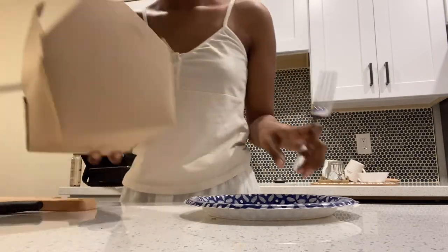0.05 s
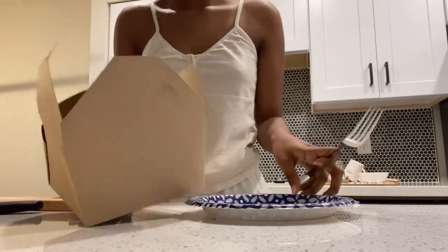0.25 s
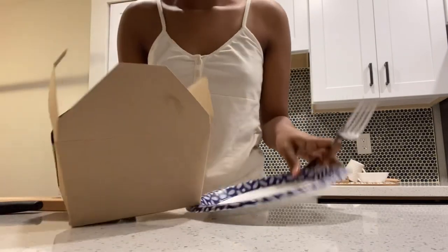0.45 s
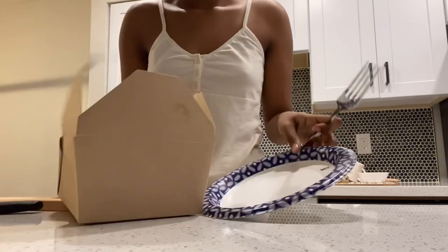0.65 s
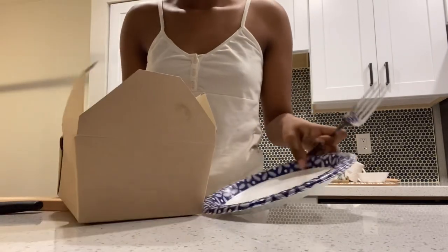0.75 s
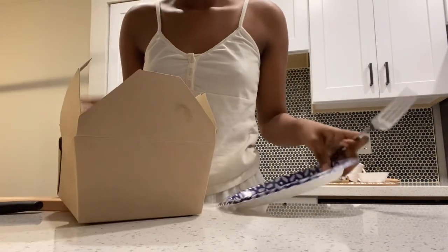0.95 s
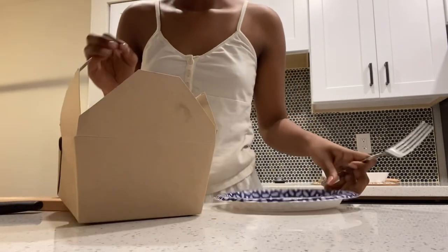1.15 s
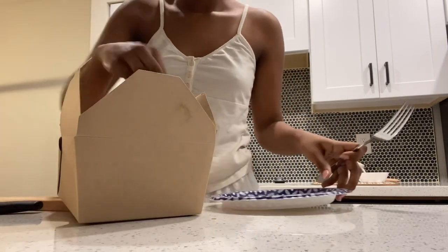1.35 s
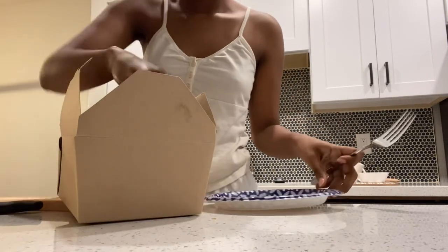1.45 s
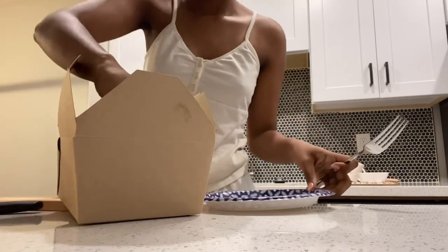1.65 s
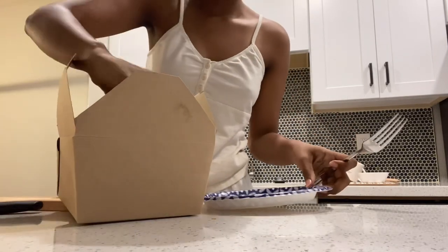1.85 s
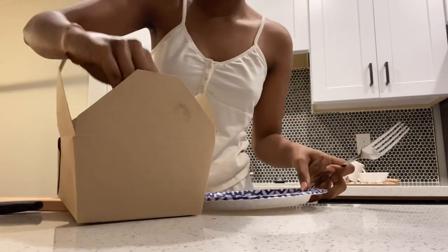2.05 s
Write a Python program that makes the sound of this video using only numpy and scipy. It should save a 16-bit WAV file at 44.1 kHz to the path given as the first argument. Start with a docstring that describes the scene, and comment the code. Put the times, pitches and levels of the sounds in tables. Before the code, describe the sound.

Hollow knocks and light scrapes of a cardboard takeout box set down on a kitchen counter.

```python
"""Takeout box on a stone countertop

A cardboard box lands on one corner, slides, and drops flat against a paper plate; each knock rings its
walls and booms in its hollow. The plate tips up, scrapes and is laid down again, and a hand rummages in
the box, paper fibres catching and slipping. A small kitchen hums and answers each knock.
A pair of microphones stands close by on the counter."""
import sys
import numpy as np
from scipy import signal
from scipy.fft import rfft, irfft
from scipy.io import wavfile

SR = 44100
rng = np.random.default_rng(int(sys.argv[2]) if len(sys.argv) > 2 else 0)


def unload_audio(sound):
    """Save the sound as a 16-bit wav file, at the path given as the first command line argument."""
    columns = np.transpose(np.atleast_2d(sound))
    # keep every value between -1 and 1, then stretch to whole-number steps
    steps = np.round(np.clip(columns, -1, 1) * 32767)
    wavfile.write(sys.argv[1], SR, steps.astype(np.int16))


N = 92610
T = np.arange(N) / SR
HZ = np.fft.rfftfreq(2 * N, 1 / SR)

# Modes of the cardboard walls. Each row: frequency in Hz, level in dB, seconds to fall 60 dB.
WALL_MODES = [(305, -13.5, 0.12), (368.5, -4.5, 0.094), (442, -13, 0.051), (530.8, -16, 0.17),
              (743, -22, 0.2), (852, -14.5, 0.044), (935, -17, 0.078), (1096, -19, 0.058),
              (1130, -24.5, 0.095), (1800, -60, 0.12)]


def amp(db):
    """Decibels to gain."""
    return 10 ** (np.asarray(db) / 20)


def unit(x):
    """Scales to rms 1."""
    return x / np.sqrt(np.mean(x ** 2) + 1e-20)


def curve(points, hz):
    """Interpolates rows of frequency and value on a log-frequency axis."""
    points_hz, values = np.transpose(points)
    return np.interp(np.log(hz + 1), np.log(points_hz + 1), values)


def pan(db):
    """Left and right gains, with the left louder by db."""
    return amp(np.array([[db], [-db]]) / 2)


def add(mix, start_s, sound):
    """Mixes a sound into both channels from a start time."""
    part = mix[:, round(start_s * SR):][:, :sound.shape[-1]]
    part += sound[..., :part.shape[1]]


def colour(x, db):
    """Minimum-phase filter with a gain in dB at each frequency of HZ."""
    log_gain = np.log(amp(np.r_[db, db[-2:0:-1]]))
    response = np.exp(np.conj(signal.hilbert(log_gain)))[:N + 1]
    return irfft(rfft(x, 2 * N) * response)[..., :N]


def pair(a, b, likeness):
    """Two channels from two unrelated sounds; likeness is their correlation."""
    return np.array([a, likeness * a + np.sqrt(1 - likeness ** 2) * b])


def ring(modes, t):
    """Struck modes ring as a sum of dying sines."""
    return sum(amp(db - 60 * t / t60) * np.sin(2 * np.pi * hz * t) for hz, db, t60 in modes)


def appliance_hum():
    """Steady low rush of kitchen appliances."""
    # Tone of the rush. Each row: frequency in Hz, relative level in dB.
    spectrum = [(40, -6.5), (58, 2.5), (80, -8.5), (112, -16), (168, 0), (205, -5.5), (300, -2),
                (420, -11.5), (750, -15), (1100, -21.5), (1500, -37), (3000, -47.5), (15000, -56.5)]
    noise = pair(*rng.standard_normal((2, N)), likeness=0.09)
    return amp(-46) * unit(colour(noise, curve(spectrum, HZ)))


def kitchen_echo(x):
    """Quick reflections from counter and cupboards, then a short tail."""
    # Decay of the room. Each row: frequency in Hz, seconds to fall 60 dB.
    room_t60 = [(80, 0.34), (260, 0.27), (700, 0.27), (2000, 0.45), (5000, 0.5), (14000, 0.066)]
    gap_s, early_decay_s, echoes_per_s = 0.0034, 0.0039, 3000
    t = T[:SR // 2]
    shape = (2, 2, len(t))
    early, tail = rng.choice([-1., 1.], shape) * (rng.random(shape) < echoes_per_s / SR)
    hz, when, bands = signal.stft(tail, SR, nperseg=256)
    bands *= amp(-60 * when / curve(room_t60, hz)[:, None])
    tail = signal.istft(bands, SR, nperseg=256)[1][:, :len(t)] * (t > gap_s)
    early *= np.exp(-t / early_decay_s) * (t > gap_s)
    echo = (amp(-3.5) * unit(early) + amp(-6.5) * unit(tail)) / np.sqrt(len(t))
    return signal.fftconvolve(x, echo, axes=1)[:, :N]


def brief_resonances():
    """A scrape or a light bump sets one resonance of box or plate ringing briefly."""
    # Each row: start in seconds, decay in seconds, pitch in Hz, bandwidth in Hz, level in dB.
    resonances = [(0.344, 0.017, 1830, 520, -38.5), (0.319, 0.038, 8130, 450, -49.5),
                  (.597, 0.018, 1010, 385, -24.5), (.82, 0.025, 920, 80, -39.5),
                  (1.766, 0.056, 4350, 300, -68), (2.053, .03, 1110, 206, -42),
                  (2.056, 0.032, 583, 50, -41)]
    attack_s = 0.0013
    t, mix = T[:SR // 2], np.zeros((2, N))
    for start_s, decay_s, hz, width_hz, db in resonances:
        band = 1 / (1 + (2 * (HZ - hz) / width_hz) ** 4)
        drive = rng.standard_normal(2 * N)
        swell = (1 - np.exp(-t / attack_s)) * np.exp(-t / decay_s)
        ringing = irfft(rfft(drive) * band)[:len(t)] * swell
        add(mix, start_s, amp(db) * unit(ringing) * np.sqrt(np.mean(swell ** 2)))
    return mix


def friction(spectrum, likeness=0.041, grains_per_s=7000):
    """Paper fibres catch and slip: dense clicks of uneven size that come in clumps."""
    spread_db, flutter_db, clump_s = 0.5, 2.5, 0.0082
    sizes = amp(spread_db * np.minimum(rng.exponential(1, (2, N)), 4))
    signs = rng.choice([-1, 1], (2, N))
    grains = sizes * signs * (rng.random((2, N)) < grains_per_s / SR)
    clumps = unit(signal.fftconvolve(rng.standard_normal(N), np.hanning(int(2 * clump_s * SR)), "same"))
    clicks = pair(*grains, likeness) * amp(flutter_db * clumps)
    return unit(colour(clicks, curve(spectrum, HZ)))


def rubs():
    """Cardboard, plate and hand rub: strokes of scratch, fine fizz and a rumble that rings the walls."""
    # Each row: start in seconds, length in seconds, then rumble, scratch and fizz levels in dB.
    strokes = [(0.258, 0.052, -64, -67, -69), (0.311, 0.066, -39.5, -48, -54),
               (0.377, 0.175, -44, -57, -59.5), (0.522, 0.034, -38, -45.5, -56),
               (0.547, 0.072, -36.5, -49.5, -57), (0.613, 0.072, -33.5, -61, -62),
               (0.732, 0.12, -41, -65, -73), (0.783, 0.013, -35, -44.5, -45.5),
               (0.789, 0.066, -44, -53.5, -46.5), (0.856, 0.067, -68, -61, -64),
               (0.943, 0.096, -54, -56, -52), (1.044, 0.12, -55.5, -57, -59),
               (1.286, 0.039, -58.5, -66.5, -72), (1.362, 0.1, -61.5, -65, -68.5),
               (1.471, 0.2, -60.5, -64.5, -70), (1.576, 0.098, -52.5, -63, -66),
               (1.693, 0.57, -54, -66.5, -74.5), (1.931, 0.13, -49.5, -62.5, -67.5),
               (2.045, .08, -48, -57.5, -71)]
    # Tone of the three parts of a rub. Each row: frequency in Hz, relative level in dB.
    rumble_tone = [(40, -34), (80, 3.5), (115, -3), (250, -2), (430, -12.5), (600, 0), (880, -4),
                   (1150, -1), (1400, -17.5), (2500, -21), (6000, -48.5)]
    scratch_tone = [(400, -26), (1450, -4), (1900, -1), (2300, 3.5), (3700, 0.5), (4450, 2.5), (5300, -4.5),
                    (7400, -1.5), (8300, -2.5), (10000, -20), (15000, -52)]
    fizz_tone = [(2000, -44), (5000, -0.5), (7000, 0.5), (8700, 6), (10000, 4), (12000, 5.5), (14300, 0.5),
                 (15600, -42)]
    attack_s, release_s, fizz_lag_s = 0.012, 0.019, 0.000136
    power = np.zeros((3, N))
    for start_s, length_s, *levels_db in strokes:
        rise = np.clip((T - start_s) / attack_s, 0, 1)
        fall = np.exp(-np.maximum(T - start_s - length_s, 0) / release_s)
        power += (amp(levels_db)[:, None] * rise * fall) ** 2
    rumble_gain, scratch_gain, fizz_gain = np.sqrt(power)
    drag = friction(rumble_tone)
    ringing = signal.fftconvolve(drag, ring(WALL_MODES, T[:SR // 2])[None], axes=1)[:, :N]
    rumble = unit(drag + amp(-9) * unit(ringing))
    fizz = friction(fizz_tone, likeness=0.93)
    fizz[1] = np.roll(fizz[1], round(fizz_lag_s * SR))  # reaches the right microphone later
    scratch = friction(scratch_tone, grains_per_s=1500)
    return pan(4.5) * rumble_gain * rumble + scratch_gain * scratch + fizz_gain * fizz


def snap(t, top_hz, decay_s):
    """A stiff paper edge lets go: a crack of noise with a short tail."""
    tail_db, tail_s = -21.5, 0.0048
    envelope = np.exp(-t / decay_s) + amp(tail_db) * np.exp(-t / tail_s)
    noise = pair(*rng.standard_normal((2, len(t))), likeness=0.097)
    return signal.lfilter(*signal.butter(2, top_hz, fs=SR), envelope * noise)


def crackles():
    """Paper crackles in small, very short snaps."""
    # Each row: start in seconds, level in dB.
    ticks = [(0.3066, -33), (0.548, -22), (.602, -45), (0.6745, -28.5), (0.948, -32), (1.156, -32),
             (1.4862, -35), (1.836, -41)]
    mix = np.zeros((2, N))
    for start_s, db in ticks:
        tick = snap(T[:SR // 2], top_hz=10200, decay_s=0.00016)
        add(mix, start_s, amp(db) * np.diff(tick))  # diff brightens the snap
    return mix


def bending_waves(x):
    """Cardboard carries low notes more slowly than high ones, so each thud drops in pitch."""
    bass_lag_s, half_lag_hz = 0.00473, 242
    phase = 2 * np.pi * bass_lag_s * half_lag_hz * np.arctan(HZ / half_lag_hz)
    return irfft(rfft(x, 2 * N) * np.exp(-1j * phase))[:, :N]


def knocks():
    """Box and plate strike: each contact is a brief slap that rings the walls, a boom and a dry snap."""
    # Each row: start in seconds, slap level in dB, slap pitch in Hz, boom level in dB, snap level in dB,
    # snap low-pass in Hz, left over right in dB.
    contacts = [(0.2439, -8, 519, -20, -25.5, 4300, 3), (.2478, -12.5, 850, -54, -67, 2114, 1),
                (0.2567, -19, 704, -35, -59, 2010, -5), (0.3075, -22.5, 1080, -56, -21.5, 5030, -2.5),
                (.329, -25.5, 710, -44, -46, 8000, 5), (0.354, -24.5, 730, -45, -38, 4000, 5),
                (0.5468, -10, 1054, -28.5, -12, 2670, 5.5), (0.5543, -27, 356, -32, -22.5, 6040, 4.5),
                (0.581, -20.5, 860, -21.5, -29, 3000, 2), (0.5956, -13, 860, -42, -47, 9000, 0),
                (0.602, -25, 880, -51, -14.5, 7100, -2), (0.6057, -17.5, 910, -66, -62, 5000, -1),
                (0.6762, -17, 842, -48, -19.5, 4200, -1), (0.69, -28.5, 355, -29.5, -46, 2900, 8.5),
                (.820, -26, 900, -61, -34.5, 4170, -4), (1.056, -34, 1110, -58, -30.5, 8000, -0.5),
                (1.1672, -34, 520, -42, -34.5, 3970, -7), (1.1975, -26.5, 784, -57, -35, 3100, -2),
                (1.486, -51, 1870, -70, -30.5, 9600, -5)]
    # Low modes of the hollow box. Each row: frequency in Hz, level in dB, seconds to fall 60 dB.
    hollow_modes = [(63.4, -18, 0.083), (81.3, -1.5, 0.14), (134, 2.5, 0.056), (158.2, -4.5, 0.22),
                    (200.6, -1.5, 0.09)]
    # Tone of the snaps. Each row: frequency in Hz, gain in dB.
    snap_tone = [(200, -19), (900, 4), (2000, 4.5), (4200, 1.5), (6000, -3), (8500, -1), (12000, -9),
                 (16000, -37)]
    boom_rise_s, cycles_to_peak = 0.0032, 0.73
    t = T[:SR // 2]
    walls = ring(WALL_MODES, t)
    boom = ring(hollow_modes, t) * (1 - np.exp(-t / boom_rise_s))
    thuds, snaps = np.zeros((2, 2, N))
    for start_s, slap_db, hz, boom_db, snap_db, top_hz, pan_db in contacts:
        age = t * hz / cycles_to_peak
        slap = age ** 2 * np.exp(2 * (1 - age)) * np.sin(2 * np.pi * hz * t)
        ringing = signal.fftconvolve(slap / abs(rfft(slap)).max(), walls)[:len(t)]
        add(thuds, start_s, pan(pan_db) * (amp(slap_db) * (slap + ringing) + amp(boom_db) * boom))
        add(snaps, start_s, pan(pan_db) * amp(snap_db) * snap(t, top_hz, decay_s=0.00065))
    return bending_waves(thuds) + colour(snaps, curve(snap_tone, HZ))


def scene():
    """Box and plate knock and rub on the counter, with their echo, over the kitchen's hum."""
    hits = knocks() + crackles()
    handling = rubs() + brief_resonances()
    return hits + handling + kitchen_echo(hits + amp(-5.5) * handling) + appliance_hum()


def record(dry):
    """Two close microphones: alike in the bass, leaning right, with a treble dip, low and high cuts."""
    # Balance of the pair. Each row: frequency in Hz, left over right in dB.
    balance = [(60, -4.5), (200, -4.5), (380, -7.5), (700, -6), (1300, -1.5), (15000, 0)]
    mono_below_hz, low_cut_hz, high_cut_hz = 250, 48, 15700
    dip_hz, dip_half_width_hz, dip_centre_db = 10400, 647, -20.5
    mid, side = dry.mean(0), (dry[0] - dry[1]) / 2
    side = irfft(rfft(side, 2 * N) * HZ / np.hypot(HZ, mono_below_hz))[:N]
    dip_db = dip_centre_db * np.exp(-((HZ - dip_hz) / dip_half_width_hz) ** 4)
    lean_db = curve(balance, HZ) / 2
    heard = np.array([colour(mid + side, dip_db + lean_db), colour(mid - side, dip_db - lean_db)])
    low_cut = signal.butter(4, low_cut_hz, "high", fs=SR, output="sos")
    high_cut = signal.firwin(511, high_cut_hz, window=("kaiser", 9), fs=SR)
    return signal.oaconvolve(signal.sosfilt(low_cut, heard), high_cut[None], "same")


dry = scene()
out = record(dry)
unload_audio(out)
```